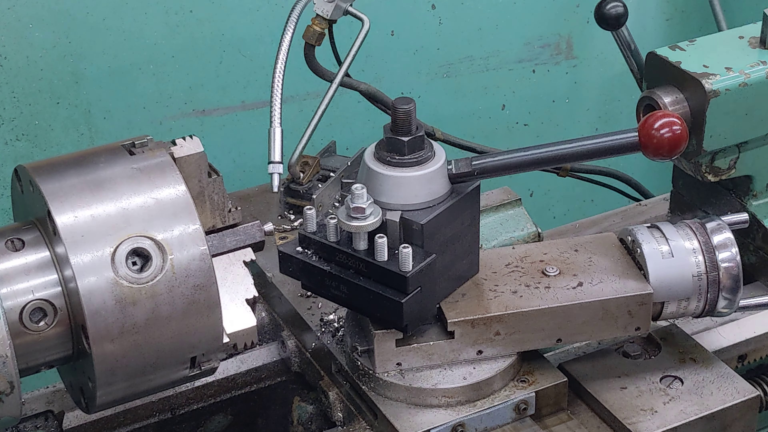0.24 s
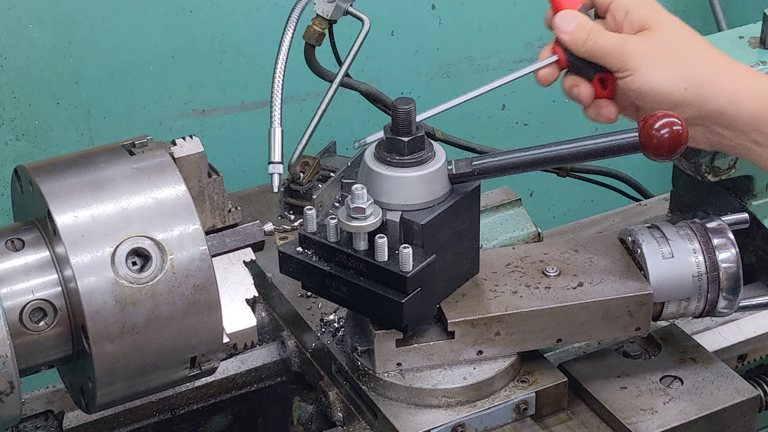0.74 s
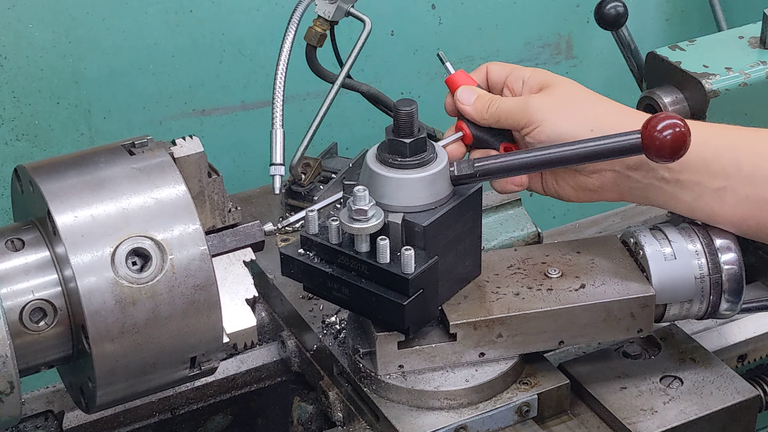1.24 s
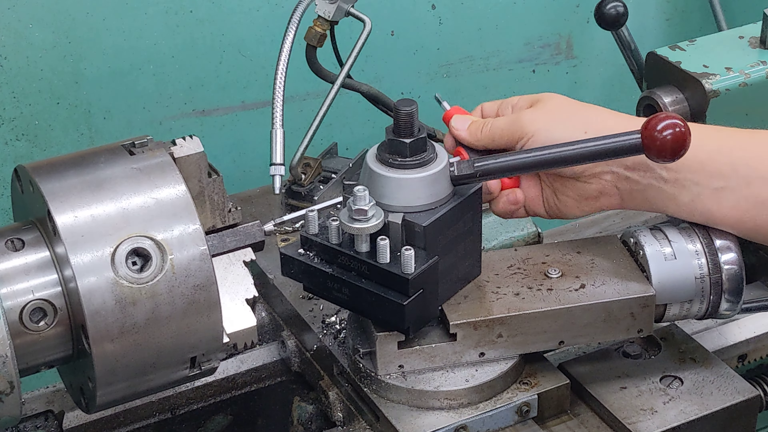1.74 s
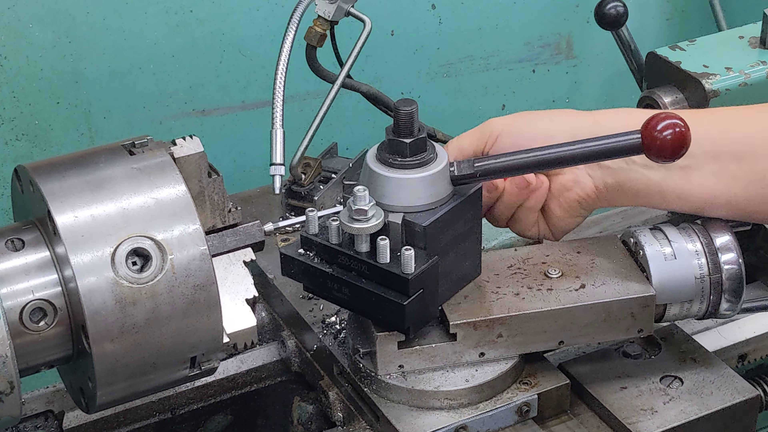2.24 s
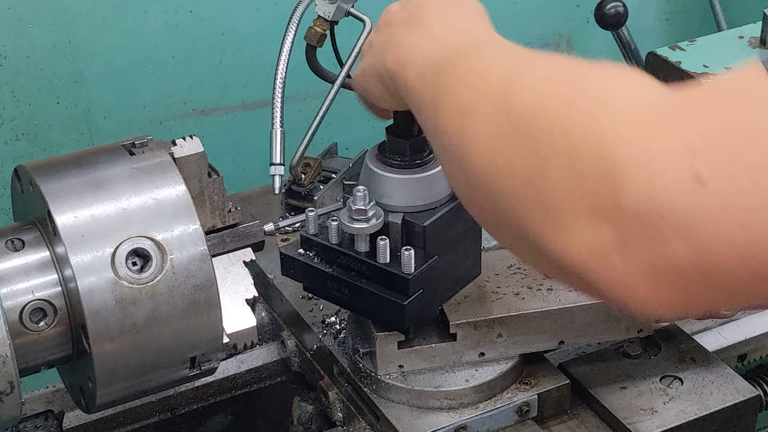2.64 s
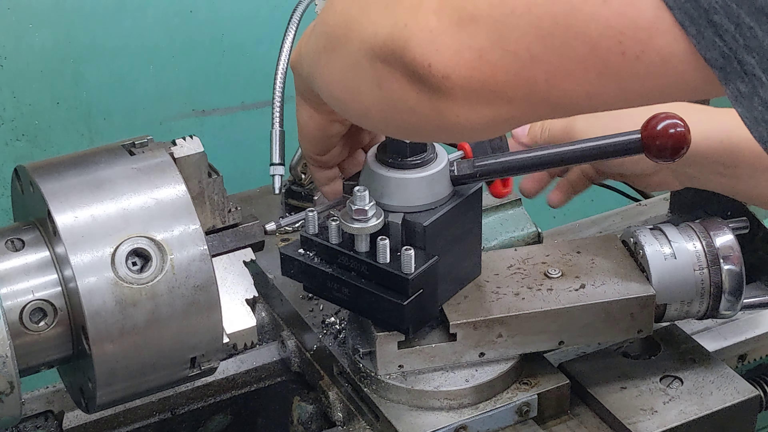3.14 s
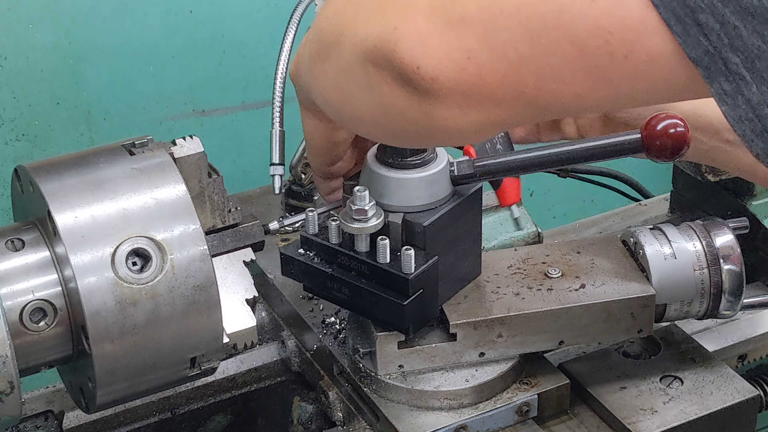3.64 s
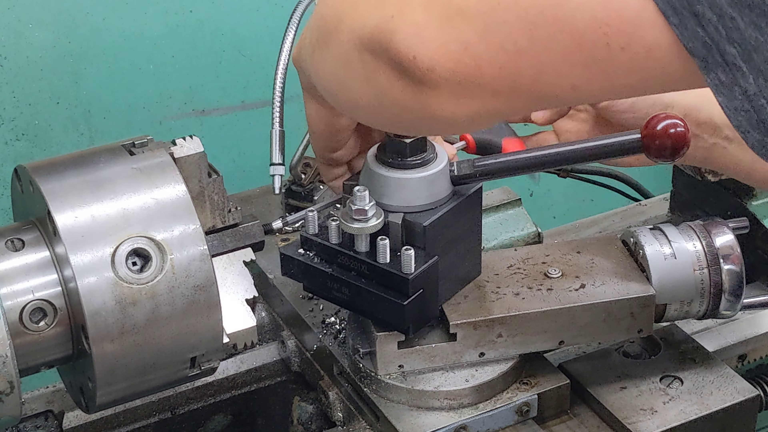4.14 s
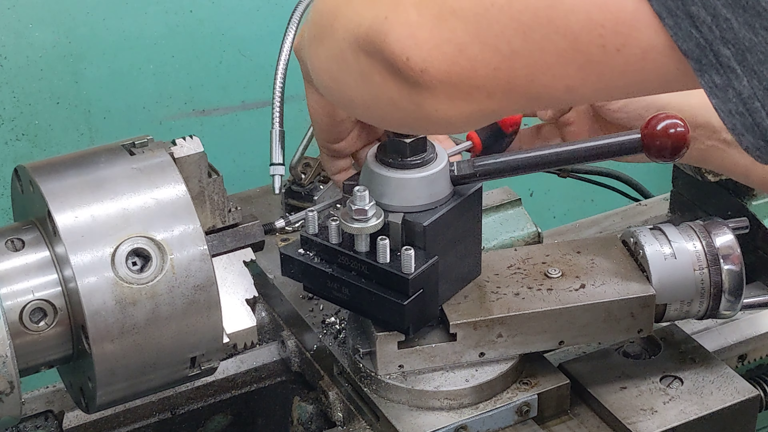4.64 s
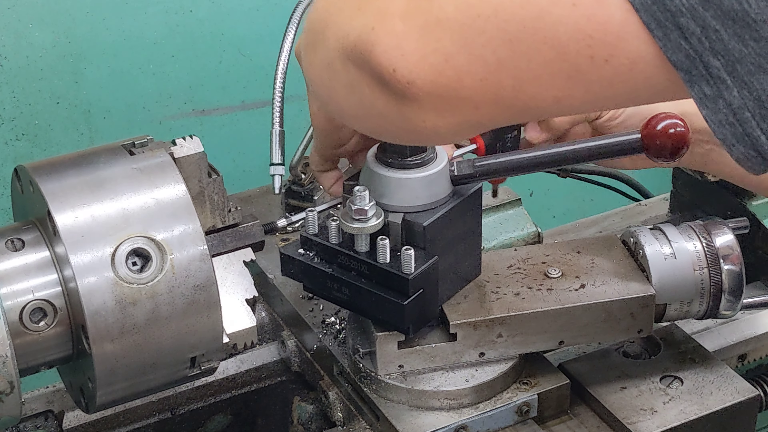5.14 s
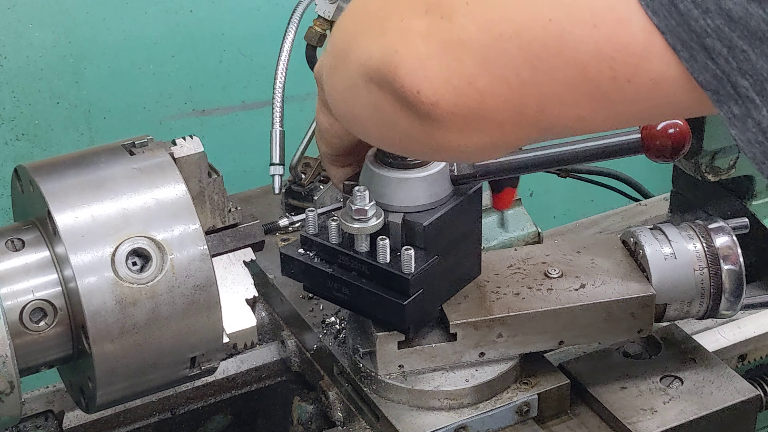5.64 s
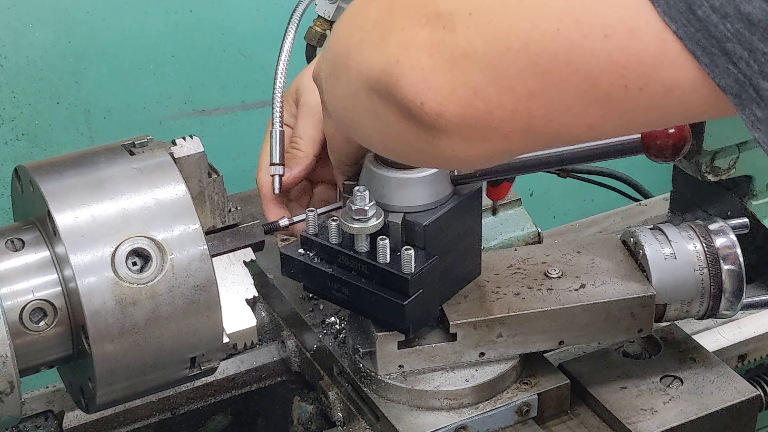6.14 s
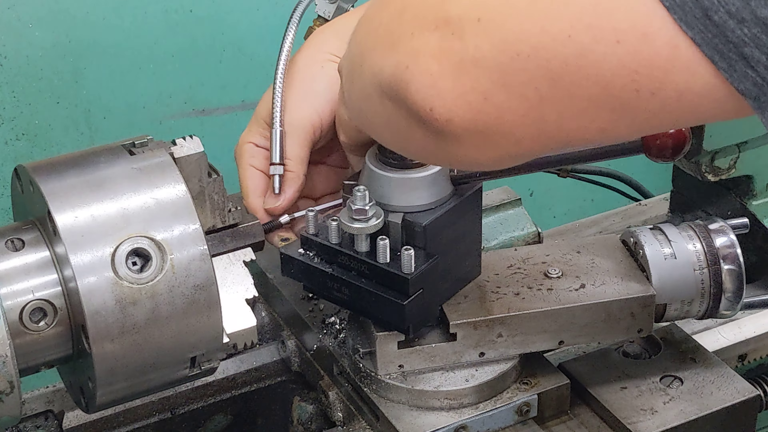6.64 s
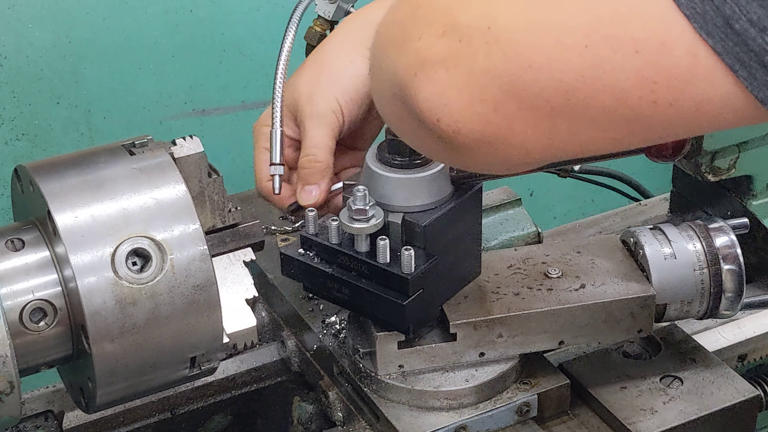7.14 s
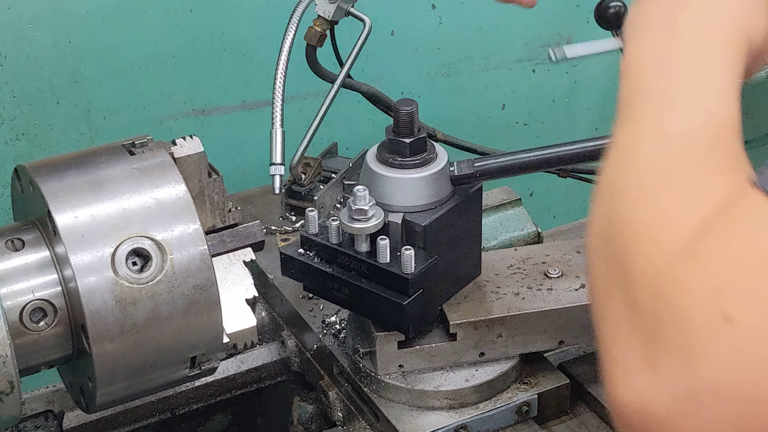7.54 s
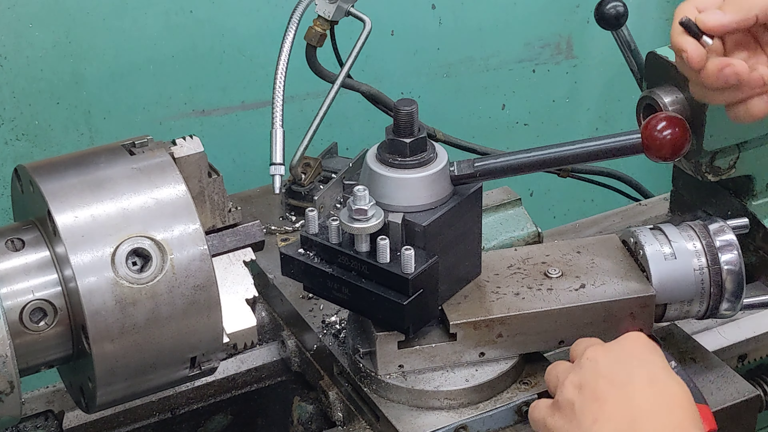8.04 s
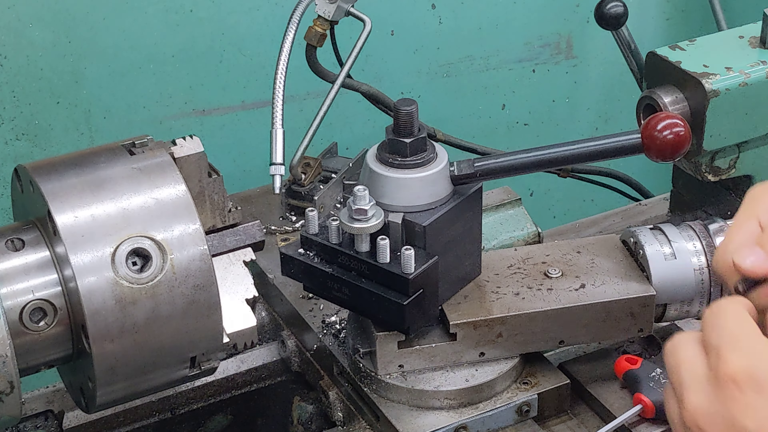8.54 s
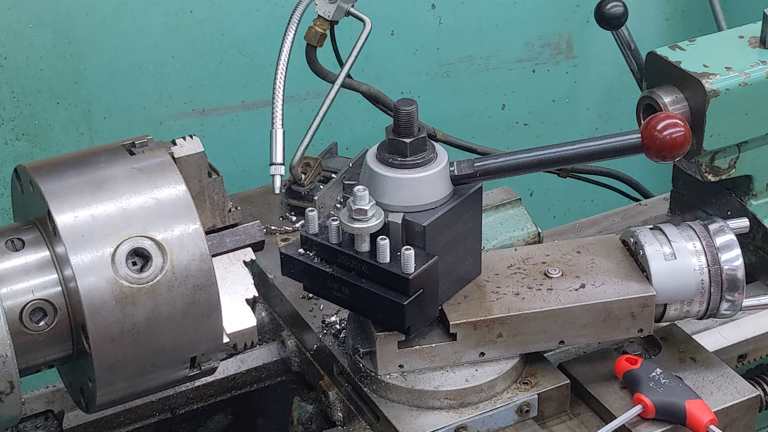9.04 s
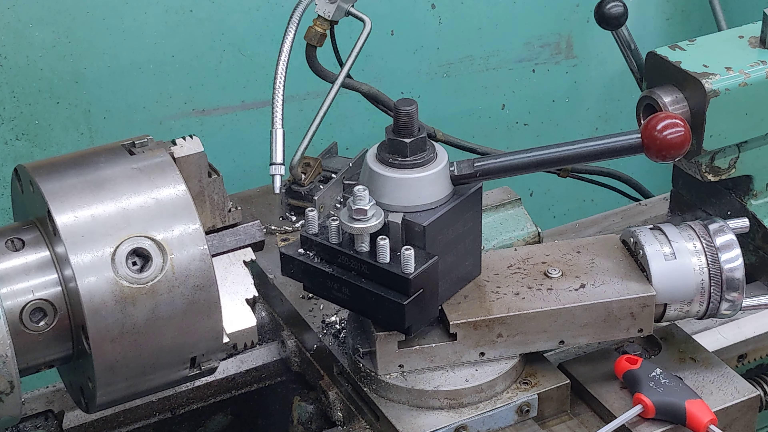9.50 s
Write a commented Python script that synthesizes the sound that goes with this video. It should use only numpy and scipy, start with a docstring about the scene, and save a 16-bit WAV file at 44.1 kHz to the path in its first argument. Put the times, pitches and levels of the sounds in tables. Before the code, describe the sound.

Steady, bright blast of nozzle air in a workshop, softening after a second, with two metallic key clicks and a brief hand-muffled swish.

```python
"""Mist nozzle on a stopped lathe

Heard close, in stereo: an air jet roars on the tool edge (noise through resonances) and hisses at the
orifice (treble noise, to the right). A hand turns it down, later crosses it and lifts the tool out.
A hex key clicks in a screw (decaying sines, cracks and thuds). The workshop behind rumbles in low noise;
its motors hum in sines, one pair beating slowly, and a thin whine comes and goes."""
import sys
import numpy as np
from scipy import signal
from scipy.fft import rfft, irfft, next_fast_len
from scipy.io import wavfile
from scipy.ndimage import uniform_filter1d, map_coordinates

SR = 44100
rng = np.random.default_rng(int(sys.argv[2]) if len(sys.argv) > 2 else 0)


def elevation(decibels):
    """Turn decibel levels (scalar or array-like) into linear amplitude ratios."""
    levels = np.asarray(decibels, float)
    return 10 ** (levels / 20)


def output_pcm(signal):
    """Save a mono or channel-first signal as 16-bit PCM at the path in sys.argv[1].

    Samples are clipped to [-1, 1] before scaling.
    """
    pcm = np.clip(np.atleast_2d(signal).T, -1, 1) * 32767
    wavfile.write(sys.argv[1], SR, np.round(pcm).astype(np.int16))


N = 430853
T = np.arange(N) / SR


def unit(x):
    """Scale to rms 1."""
    return x / np.sqrt(np.mean(x ** 2) + 1e-20)


def along(points, hz):
    """Read (frequency [Hz], value) points on a log frequency axis."""
    f, value = np.transpose(points)
    return np.interp(np.log(hz + 1), np.log(f + 1), value)


def wobble(rate):
    """A smooth random curve with rate knots a second."""
    knots = rng.standard_normal(int(N * rate / SR) + 4)
    return map_coordinates(knots, [T * rate])


def filtered(x, response):
    """Multiply the spectrum of x by a complex response of frequency."""
    m = next_fast_len(N + 8192)
    return irfft(rfft(x, m) * response(np.fft.rfftfreq(m, 1 / SR)), m)[..., :N]


def resonances(modes):
    """Summed causal resonances, each with its own gain on either side."""
    def response(f):
        total = 0
        for centre, width, left_db, right_db in modes:
            gain = elevation([[left_db], [right_db]])
            total = total + gain * 1j * f * width / (centre * centre - f * f + 1j * f * width)
        return total
    return response


def tilted(left_minus_right_db):
    """Left and right gains that share a level difference equally."""
    return elevation(np.outer([.5, -.5], left_minus_right_db))


def rush(spectrum, alike, patchy_db):
    """Stereo turbulence: shaped noise of rms 1 whose gain varies in random time-frequency patches."""
    z = signal.stft(rng.standard_normal((2, N)), nperseg=512)[2]
    field = uniform_filter1d(rng.standard_normal(z.shape[1:]), size=8, axis=0)
    field = uniform_filter1d(field, size=10, axis=1)
    pair = signal.istft(z * elevation(patchy_db * unit(field)), nperseg=512)[1][:, :N]

    def mid_side(hz):
        # the angle shares the power so that left and right are as alike as asked
        angle = np.arccos(np.clip(along(alike, hz), -1, 1)) / 2
        return elevation(along(spectrum, hz)) * [np.cos(angle), np.sin(angle)]

    mid, side = filtered(pair, mid_side)
    return unit(np.array([mid + side, mid - side]))


def echoes(x, echo_db, span_s, count):
    """Steel faces close by return weak copies, different at each port: a fine comb on the spectrum."""
    paths = np.zeros((2, round(span_s * SR) + 40))
    paths[:, 0] = 1
    for side in paths:
        delay, sign = rng.random((count, 2)).T
        # later copies are weaker; either polarity
        side[(30 + delay * span_s * SR).astype(int)] = elevation(echo_db - 6 * delay) * np.sign(sign - .5)
    paths /= np.linalg.norm(paths, axis=1, keepdims=True)
    return signal.fftconvolve(x, paths, axes=1)[:, :N]


def late_left(x, lag_s):
    """Delay the left port: the nozzle is nearer the right one."""
    return filtered(x, lambda hz: np.exp(-2j * np.pi * np.outer([lag_s, 0], hz)))


def move(start_s, rise_s, hold_s, fall_s):
    """A gesture from 0 to 1 and back: rise, hold, fall."""
    return np.interp(T, np.cumsum([start_s, rise_s, hold_s, fall_s]), [0, 1, 1, 0])


# gestures; a 20 s hold stays to the end
VALVE = move(0.83, 0.45, 20, 1)  # the flow is turned down
SETTLE = move(1.4, 1.04, 20, 1)  # rumble, spill and hiss sink to a lower level
ARM = move(2.6, .5, 0.85, 4.3)  # a forearm leans over the post and returns some roar
REACH = move(6.2, .5, .05, .35)  # fingers reach toward the nozzle and turn its hiss to the left
COVER = move(6.83, .08, .212, .013)  # the hand stands in the jet
TOOL_OUT = move(6.86, .45, 20, 1)  # the tool leaves the jet

# the hand around the jet: (time [s], closeness [0-1])
HAND_PATH = [(6.4, 0), (6.72, .12), (6.8, .55), (6.91, .55), (7.05, 1), (7.122, .87), (7.18, .2), (7.25, 0)]


def hand_closeness():
    """How closely the hand surrounds the jet, joined point to point."""
    time_s, closeness = np.transpose(HAND_PATH)
    return np.interp(T, time_s, closeness)


# roar spectrum: (frequency [Hz], relative level per Hz [dB])
ROAR_SPECTRUM = [(350, -56), (600, -23), (768, -22.5), (925, -16), (1020, -17.5), (1110, -12.5), (1340, -9),
                 (1920, -2), (3470, -0.5), (4670, -3), (6930, -0.5), (10300, -10.5), (11500, -13),
                 (15000, -7.5), (22000, -120)]
# stereo balance of the roar: (frequency [Hz], left minus right [dB])
ROAR_BALANCE = [(60, -0.5), (130, 0.0), (290, 3), (640, 1.8), (1410, -1), (3100, -0.5), (6820, -1.5),
                (15000, 1.5)]
# share of the jet both ports hear alike: (frequency [Hz], likeness [0-1])
ROAR_LIKENESS = [(500, 0.72), (1200, 0.36), (2500, 0.44), (5000, 0.18), (9000, 0.63), (13000, 0.06),
                 (15500, 0.1)]
# hollows of the machine bed: (frequency [Hz], width [Hz], left gain [dB], right gain [dB])
BED_HOLLOWS = [(925, 50, -8, -8), (1110, 60, -5, -7), (1240, 70, -7, -5), (1950, 110, -4, -8),
               (2155, 90, -8, -3), (2740, 80, -8, -4), (3170, 80, -1, -8)]
# gaps around the clamped tool: (frequency [Hz], width [Hz], left gain [dB], right gain [dB])
TOOL_GAPS = [(3390, 70, -4, -4), (4070, 45, -1, -4), (5205, 80, -5, -9), (5430, 60, -5, 0),
             (6252, 50, -5, -5), (6781, 90, -9, 0)]


def edge_roar(close, flutter):
    """Turbulence on the tool edge rings the bed hollows and tool gaps; its deep part spills around."""
    level_db = -25.5 - 4 * VALVE + 1.1 * ARM - 1.5 * TOOL_OUT
    shadow_db = -8.8 * COVER + 2 * close * (1 - COVER)
    spill_db = -45.5 - 3.2 * SETTLE
    gap_share = 1 - 0.75 * TOOL_OUT  # the empty holder keeps a quarter of the gap tones
    roar = rush(ROAR_SPECTRUM, ROAR_LIKENESS, patchy_db=0.51)
    roar = roar + filtered(roar, resonances(BED_HOLLOWS))
    roar = roar + gap_share * filtered(roar, resonances(TOOL_GAPS))
    roar = unit(filtered(roar, lambda hz: tilted(along(ROAR_BALANCE, hz))))
    # the hand takes the jet off the edge; the top of the roar stays
    top = filtered(roar, lambda hz: 1 / (1 + (7000 / (hz + 1)) ** 8))
    deep = filtered(roar, lambda hz: 1 / (1 + (hz / 1350) ** 8))
    roar = top + elevation(shadow_db) * (roar - top - deep)
    roar = elevation(level_db + 0.22 * flutter + 0.18 * wobble(4)) * roar
    return late_left(roar + elevation(spill_db) * unit(deep), lag_s=3.3e-5)


# hiss spectrum: (frequency [Hz], relative level per Hz [dB])
HISS_SPECTRUM = [(5000, -25.5), (8000, -6.5), (10700, -10.5), (11400, -6), (12600, -1.5), (14200, 1.5),
                 (15200, 0), (15650, 3), (15800, -2.5)]
# share of the hiss both ports hear alike: (frequency [Hz], likeness [0-1])
HISS_LIKENESS = [(8000, .3), (11500, .15), (13500, .5), (14500, .45), (15500, .2)]


def orifice_hiss(close, flutter):
    """The small orifice sheds thin treble noise to the right, with an extra top band at full flow."""
    level_db = -23 - 7.5 * VALVE - 3 * SETTLE + REACH - 0.5 * TOOL_OUT + 8.5 * close
    pan_db = -7 - 3.5 * VALVE + 2.5 * REACH - 1.5 * TOOL_OUT + 3 * close  # left minus right
    open_db = -9 - 10 * VALVE - 7 * SETTLE  # over the hiss
    hiss = rush(HISS_SPECTRUM, HISS_LIKENESS, patchy_db=1.16)
    # noise strongest above 15 kHz, with a weaker bump at 13 kHz
    open_spectrum = [(11500, -25), (13000, -9), (14200, -20), (15200, 0), (15900, 4)]
    open_band = rush(open_spectrum, HISS_LIKENESS, patchy_db=-2.0)
    hiss = (hiss + elevation(open_db) * open_band) * tilted(pan_db)
    hiss = elevation(level_db + .5 * flutter + 0.15 * wobble(11)) * hiss
    return late_left(hiss, lag_s=1.2e-5)


def jet():
    """One air stream feeds roar and hiss, and steel close by echoes both."""
    close = hand_closeness()
    flutter = wobble(25)  # droplets make the flow stutter
    both = edge_roar(close, flutter) + orifice_hiss(close, flutter)
    return echoes(both, echo_db=-21, span_s=.024, count=26)


# rumble spectrum: (frequency [Hz], relative level per Hz [dB])
RUMBLE_SPECTRUM = [(21, -46), (35, -23), (64, -5), (134, -8), (184, -3.5), (264, -13.5), (347, -1),
                   (463, -10), (703, -4), (778, -5), (912, -13.5), (1020, -15), (1100, -5), (1430, -38),
                   (2420, -120)]
# share of the low noise both ports hear alike: (frequency [Hz], likeness [0-1])
SHOP_LIKENESS = [(40, .97), (125, .96), (270, .92), (500, .7), (1100, .6)]
# motor and mains tones: (frequency [Hz], relative level [dB])
HUM_TONES = [(54.4, -20), (57.03, -11.5), (114.05, -12.5), (119.98, -21), (163.24, -11.5), (199.53, -7.5)]


def machines():
    """Far machines make low noise and hum tones; two motors close in pitch beat about once a second."""
    level_db = -53 - 8.7 * SETTLE
    rumble = elevation(3.5) * rush(RUMBLE_SPECTRUM, SHOP_LIKENESS, patchy_db=1.5)
    hum = 0
    for hz, db in HUM_TONES:
        tone = np.sin(2 * np.pi * (hz * T + rng.random()))
        hum = hum + elevation(db + 2.0 + 1.6 * wobble(2.98)) * tone
    beat = 0
    for hz, db in [(343.51, -61), (342.54, -63.5)]:
        beat = beat + elevation(db) * np.cos(2 * np.pi * hz * (T - 4.2))  # in step at 4.2 s
    # the beating pair is nearer and follows the general level only in part
    return elevation(level_db) * (rumble + hum) + elevation(0.43 * level_db + 23.5) * beat


# swells of the whine: (start [s], rise [s], hold [s], fall [s], level [dB])
WHINE_SWELLS = [(0, 1.1, .6, .5, -56.5), (3.6, 0.54, 0.046, .4, -64.5), (4.6, .2, .05, 0.26, -65),
                (5.3, 0.58, 0.56, 0.21, -62), (6.4, 0.58, .1, 0.6, -56), (7.3, .3, .8, .3, -64)]


def whine():
    """A thin sine near 542 Hz swells and fades, wavering in pitch and level."""
    swell = sum(elevation(db) * move(*shape) for *shape, db in WHINE_SWELLS)
    cycles = np.cumsum(542 + 3.47 * wobble(12)) / SR
    return swell * elevation(1.5 * wobble(8)) * np.sin(2 * np.pi * cycles)


# key contacts: (time [s], level [dB], left minus right [dB], part [0 socket, 1 shaft], thud level [dB])
KEY_CONTACTS = [(2.1592, -12.5, 5, 0, -50), (2.1622, -15, 2, 0, -61), (2.3916, -7, -4, 1, -47),
                (2.3958, -8.5, -6, 1, -59)]
# ringing of the screw socket: (frequency [Hz], level [dB], 60 dB decay time [s])
SOCKET_MODES = [(2562, -6, .022), (2982, -5, .016), (3450, -5, .016)]
# ringing of the key shaft: (frequency [Hz], level [dB], 60 dB decay time [s])
SHAFT_MODES = [(2169, -20, .07), (5895, -17, .07), (5600, -16, .04), (6713, -17, .02), (4600, -19, .03),
               (13790, -17, .02), (14770, -15, .02)]
# crack spectrum: (frequency [Hz], gain [dB])
CRACK_SPECTRUM = [(600, -50), (1500, -16), (2500, -10), (6000, -5), (8500, -6), (11000, -14), (14500, -1.5),
                  (15700, -1.5)]


def key():
    """Each contact rings the socket or the shaft, cracks, and thuds softly in the tool post."""
    out, cracks = np.zeros((2, N)), np.zeros((2, N))
    t = T[:SR // 4]
    for start_s, db, pan_db, part, thud_db in KEY_CONTACTS:
        start = round(start_s * SR)
        at = slice(start, start + len(t))
        sides = elevation(db + np.array([[.5], [-.5]]) * pan_db)
        if part > .5:
            modes, crack_db, thud_hz = SHAFT_MODES, .3, 380
        else:
            modes, crack_db, thud_hz = SOCKET_MODES, -14, 285
        ring = 0
        for hz, level_db, t60 in modes:
            decay = elevation(level_db + rng.normal(0, 0.55) - 60 * t / t60)
            ring = ring + decay * np.sin(2 * np.pi * hz * t)
        ring = ring * (1 - np.exp(-t / .00025)) ** 2  # contact builds up within a millisecond or so
        cracks[:, at] += sides * elevation(crack_db - 60 * t / .009) * rng.standard_normal(len(t))
        # several low modes of the heavy post, close together, blur the thud
        post = sum(np.sin(2 * np.pi * thud_hz * ratio * t) for ratio in (.8, 1, 1.12))
        thud = elevation(thud_db - 60 * t / .35) * (1 - np.exp(-t / .02)) ** 2 * post
        out[:, at] += sides * ring + thud
    return out + filtered(cracks, lambda hz: elevation(along(CRACK_SPECTRUM, hz)))


def room(x, t60):
    """The workshop's short diffuse answer: noise that starts after 3 ms and decays exponentially."""
    t = T[:SR // 2]
    tail = rng.standard_normal((2, len(t))) * elevation(-60 * t / t60) * (t > .003)
    return signal.fftconvolve(x, tail / np.linalg.norm(tail[0]), axes=1)[:, :N]


# air held by the cupped hand: (frequency [Hz], width [Hz], left gain [dB], right gain [dB])
CUPPED_AIR = [(657, 39, -3, 0), (944, 48, 5.5, -4.5)]


def cupped_hand():
    """Air held in the cupped hand booms as noise through its resonances while the hand is near."""
    boom = unit(filtered(rush([(100, 0)], SHOP_LIKENESS, patchy_db=2.5), resonances(CUPPED_AIR)))
    return elevation(-50.5) * hand_closeness() ** .25 * boom


def scene():
    """Jet, workshop, key with its room answer, and the cupped hand together."""
    clicks = key()
    return jet() + machines() + whine() + clicks + elevation(-4) * room(clicks, t60=.13) + cupped_hand()


def top_cut(x):
    """Nothing passes above the cut-off."""
    return signal.sosfilt(signal.butter(12, 16920, fs=SR, output="sos"), x)


def record(dry):
    """The microphone drops the deepest bass and all above its band limit."""
    band = lambda hz: (hz < 15730) / (1 + (40 / (hz + 1)) ** 6)
    mix = filtered(dry, band)
    return top_cut(mix)


dry = scene()
out = record(dry)
output_pcm(out)
```